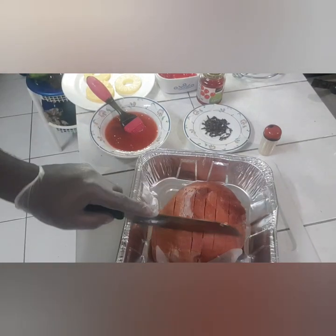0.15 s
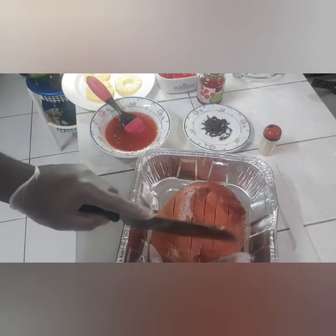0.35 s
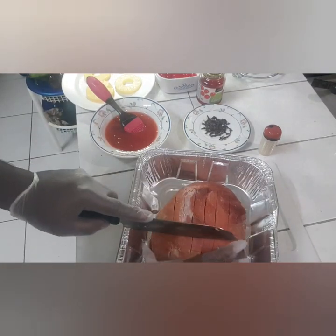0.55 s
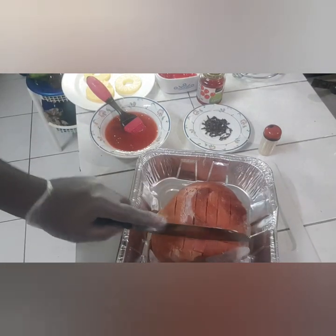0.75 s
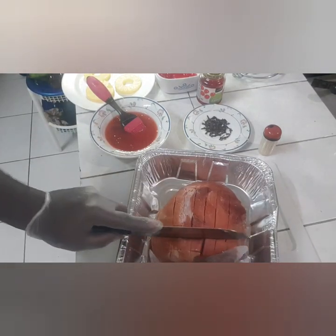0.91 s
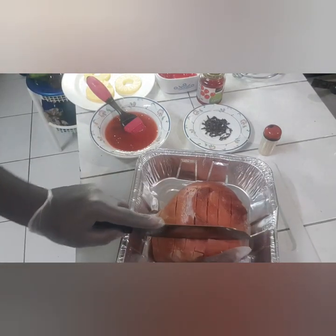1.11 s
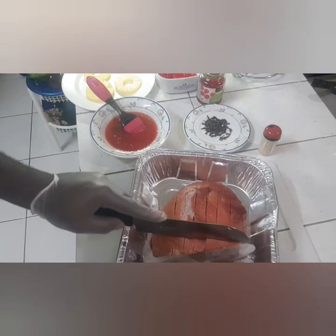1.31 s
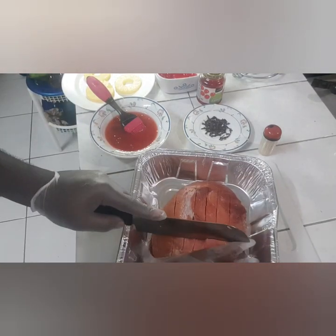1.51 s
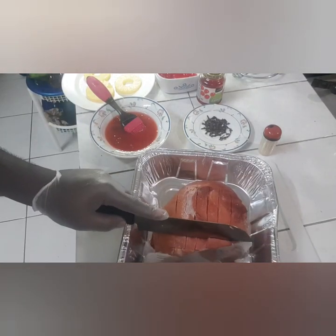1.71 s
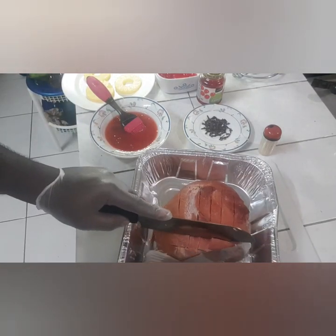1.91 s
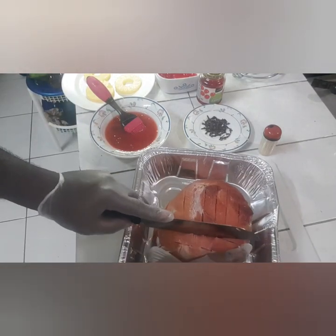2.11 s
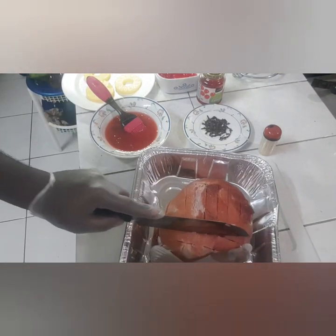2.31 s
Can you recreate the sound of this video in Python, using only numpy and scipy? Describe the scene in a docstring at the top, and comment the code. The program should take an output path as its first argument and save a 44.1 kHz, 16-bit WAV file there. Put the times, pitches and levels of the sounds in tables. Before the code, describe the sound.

Sharp, hollow pops of a thin foil pan come irregularly, close by, while a knife cuts a ham in it. Between them the pan bumps softly and the blade faintly ticks and hisses. An appliance hums in the slightly echoing kitchen.

```python
"""Hollow knocks and pops of a foil tray on a counter, as a kitchen knife scores the ham inside it.
Each push makes the thin foil crack, pop and ring; the tray rocks, bumps softly and scuffs.
The blade ticks through the rind and hisses in the meat.
A small tiled kitchen rings around it all, and an appliance hums faintly behind."""
import sys
import numpy as np
from scipy import signal
from scipy.fft import rfft, irfft, next_fast_len
from scipy.io import wavfile
from scipy.ndimage import uniform_filter1d, map_coordinates

SR = 44100
rng = np.random.default_rng(int(sys.argv[2]) if len(sys.argv) > 2 else 0)


def store_wav(level_fs):
    """Save 16-bit WAV to argv[1]."""
    pcm = np.round(np.clip(np.atleast_2d(level_fs), -1, 1) * 32767)
    wavfile.write(sys.argv[1], SR, pcm.T.astype(np.int16))


N = 103635
SHARP_ATTACK_S = 0.00017  # shared by the foil's crack and the rind's snap


def tray_knocks():
    """The foil cracks, pops and rings; each spot of contact favours two bands. One track per knock."""
    # pushes on the tray (time [s], level [dB], low band [Hz], its gain [dB], high band [Hz],
    # its gain [dB], bass shelf [dB], treble shelf [dB], ring level [dB], pop t60 [s],
    # left over right [dB], left lag [ms])
    knocks = [(0.2218, -17.5, 1070, 2, 2200, 4, -5, -0.5, -13.5, 0.065, 0, 0.031),
              (0.4300, -13.5, 1150, 1.5, 2090, 6.5, -10, 15.5, -11, 0.041, -0.5, 0.039),
              (1.234, -16.5, 863, 8.5, 1580, 8, 8.5, -14, -13, .06, 0.5, -0.071),
              (1.2970, -38.5, 1000, 6, 4100, 14, 11, 6, -9, 0.02, -3, 0),
              (1.4997, -20, 1020, 9.5, 1770, 6, 1.5, 0, -18, 0.049, -1, 0.026),
              (1.5174, -28, 1010, 8, 1300, 7.5, -4, -2, -24, 0.048, 3.5, 0.099),
              (2.0040, -27, 1600, 4, 2500, 6.5, -8, 3.5, -13.5, 0.027, 0, 0.047),
              (2.0120, -28.5, 503, -2, 1700, 12, -2, -0.5, -14, 0.027, 0, 0.091),
              (2.0668, -22.5, 1580, 6, 3450, 1, -2.5, 2.5, -27, 0.048, -0.5, -0.066)]
    # tone of the thin foil's dense ring (frequency [Hz], relative density [dB])
    foil_tone = [(60, -47.5), (250, -19.5), (380, -10.5), (500, -5), (680, -8), (1000, -2.5), (1700, -3),
                 (2600, -4.5), (3300, -9), (4200, -15.5), (6500, -22), (8200, -31.5), (11500, -27),
                 (16000, -39)]
    # modes of the tray (frequency [Hz], relative level [dB], t60 [s])
    modes = [(298.5, -1.5, 0.43), (608, -1.5, 0.24), (766, -1, 0.23), (841, -1.5, 0.14), (944, -5.5, 0.25),
             (993, -4.5, 0.25), (1071, -4.5, 0.19), (1185, 1, 0.11), (1410, -9, 0.27), (1589, -5, 0.15),
             (1790, -4.5, 0.12), (2080, -4, 0.067), (2125, 3, 0.071), (2670, 2.5, 0.067)]
    crack_db, crack_t60_s, crack_hz = -2, 0.015, 4040  # the first hard touch
    bass_hz, treble_hz = 520, 4900
    tracks, t = [], np.arange(SR // 2) / SR
    ears = np.array([[.5], [-.5]])
    for (s, db, low_hz, low_db, high_hz, high_db,
         bass_db, treble_db, ring_db, pop_t60, pan_db, lag_ms) in knocks:
        ring = sum(amp(level + 2 * rng.normal() - 60 * t / t60)
                   * np.sin(2 * np.pi * (hz * t + rng.random())) for hz, level, t60 in modes)
        crack = burst(t, crack_t60_s, SHARP_ATTACK_S)
        crack = filtered(crack, lambda hz: causal(crack_db - 14 * below(hz, crack_hz)))
        pop = burst(t, pop_t60, attack_s=0.0019)
        pop = filtered(pop, lambda hz: causal(-4 * (1 - below(hz, crack_hz))))
        knock = crack + pop + amp(ring_db) * ring / np.linalg.norm(ring)
        bands = lambda hz: low_db * bell(hz, low_hz) + high_db * bell(hz, high_hz)
        shelves = lambda hz: bass_db * below(hz, bass_hz) + treble_db * (1 - below(hz, treble_hz))
        colour = lambda hz: causal(along(foil_tone, hz) + bands(hz) + shelves(hz))
        pan = lambda hz: amp(ears * pan_db) * np.exp(-2j * np.pi * hz * ears * lag_ms / 1000)
        tracks.append(placed(s, db, filtered(knock, lambda hz: colour(hz) * pan(hz))))
    return tracks


def knife_cuts():
    """Bright snaps of the rind over the grainy hiss of the sliding blade."""
    # the blade breaks the rind (time [s], level [dB], t60 [s], body shelf [dB])
    snaps = [(0.079, -46, 0.073, -9), (0.103, -45, 0.044, -15), (1.1570, -34, 0.066, 3.5),
             (1.6850, -38, 0.0095, -9)]
    # tone of a snap (frequency [Hz], relative density [dB])
    snap_tone = [(300, -38), (1200, 4.5), (2500, 5), (5000, -7), (7000, -1), (8500, -8.5), (13000, 6),
                 (16000, -4.5)]
    # the blade slides in the meat (peak time [s], level [dB], rise [s], fall [s])
    slices = [(0.79, -59, 0.062, 0.047), (0.97, -60.5, 0.074, 0.099), (1.13, -55.5, 0.013, .01),
              (1.215, -46, .05, 0.057), (1.29, -55.5, 0.011, 0.016), (1.40, -58, 0.017, 0.033),
              (1.69, -56.5, 0.16, 0.05), (2.11, -59, 0.06, .06), (2.32, -61, 0.14, .08)]
    # tone of the blade's hiss (frequency [Hz], relative density [dB])
    hiss_tone = [(500, 1), (3000, -6), (6800, 8), (8200, -0.5), (11000, 10.5), (13500, 10), (16000, 5)]
    split_hz = 12400  # body below, sparkle above
    ticks, t = np.zeros((2, N)), np.arange(SR // 2) / SR
    for s, db, t60, body_db in snaps:
        colour = lambda hz: causal(along(snap_tone, hz) + body_db * below(hz, split_hz))
        ticks += placed(s, db, filtered(burst(t, t60, SHARP_ATTACK_S), colour))
    hiss = unit(noise(hiss_tone) * amp(3.2 * wobble(rate=600)))
    return ticks + sum(swell(*stroke) for stroke in slices) * hiss


def tray_rocking():
    """The tray rocks, bumps softly and scuffs on the counter, which thuds under the deepest push."""
    # soft bumps and scuffs of the tray (peak time [s], level [dB], rise [s], fall [s])
    bumps_and_scuffs = [(0.562, -35.5, 0.0066, 0.017), (1.005, -49.5, 0.012, 0.029),
                        (1.151, -40.5, 0.02, 0.022), (1.228, -34, .015, 0.052), (1.325, -38.5, 0.1, 0.025),
                        (1.37, -40.5, 0.0059, 0.039), (2.31, -52, 0.041, .05)]
    # tone of the tray against the counter (frequency [Hz], relative density [dB])
    contact_tone = [(40, -29), (150, -36), (310, -7), (450, -12), (620, -2.5), (900, 0), (1150, -1),
                    (1400, -6), (2200, -14), (4000, -25.5), (16000, -53)]
    # tone of the counter's thud (frequency [Hz], relative density [dB])
    thud_tone = [(25, -55), (50, -14), (68, 8), (110, -3), (200, -10.5), (500, -50)]
    contact = unit(noise(contact_tone) * amp(2.5 * wobble(rate=110)))
    thud = swell(s=1.22, db=-47.5, rise_s=0.067, fall_s=0.19) * noise(thud_tone)
    return sum(swell(*move) for move in bumps_and_scuffs) * contact + thud


def kitchen_reverb(x):
    """The tiled room's tail; the treble dies first."""
    # decay of the room (frequency [Hz], t60 [s])
    decay_times = [(150, 0.5), (600, 0.75), (1500, 0.44), (4000, 0.54), (8000, 0.41), (14000, 0.3)]
    build_s = 0.002
    white = noise([(1, 0)], size=SR * 2 // 3)
    hz, t, bands = signal.stft(white, SR, nperseg=256)
    envelope = amp(-60 * t / along(decay_times, hz)[:, None]) * (1 - np.exp(-t / build_s))
    tail = signal.istft(bands * envelope, SR, nperseg=256)[1]
    return signal.fftconvolve(x, tail / np.linalg.norm(tail[0]), axes=1)[:, :N]


def appliance_and_air():
    """Beating motor and mains tones over a bed of room air."""
    # the appliance's hum (frequency [Hz], level [dB])
    hum_tones = [(100, -58.5), (112.8, -54.5), (199.6, -59.5), (318, -70.5), (481, -61), (631, -66)]
    # room tone (frequency [Hz], relative density [dB])
    air_tone = [(15, -44), (25, -23), (53, -7.5), (80, -6), (120, -2.5), (157, -6), (223, -8.5), (301, -14),
                (489, -8), (695, -11.5), (988, -11.5), (1230, -14.5), (1700, -12), (3520, -25.5),
                (8590, -35), (12900, -32), (16000, -33)]
    air_db = -49
    t = np.arange(N) / SR
    hum = np.zeros(N)
    for hz, db in hum_tones:
        phase = 2 * np.pi * (hz * t + rng.random()) + .22 * wobble(rate=5)
        hum += amp(db) * np.sqrt(2) * np.sin(phase)
    return hum + amp(air_db) * noise(air_tone)


def burst(t, t60, attack_s, width=0.59):
    """A stereo burst of dense, fast-dying vibration with an even spectrum."""
    x = rng.standard_normal((2, len(t))) * amp(-60 * t / t60) * (1 - np.exp(-t / attack_s))
    smooth_db = lambda z: 10 * np.log10(np.abs(uniform_filter1d(np.abs(z) ** 2, size=200)) + 1e-9)
    mid, side = irfft([z * causal(-smooth_db(z)) for z in rfft(x)], len(t))
    return np.array([mid + width * side, mid - width * side])


def noise(tone, size=N):
    """Coloured stereo noise of rms 1, nearly mono in the bass."""
    # stereo image (frequency [Hz], left-right correlation [0..1])
    likeness = [(30, 0.84), (130, 1), (300, 0.85), (1000, 0.2), (3000, 0.1), (10000, 0.033)]
    angle = lambda hz: np.arccos(np.clip(along(likeness, hz), -1, 1)) / 2
    gains = lambda hz: amp(along(tone, hz)) * [np.cos(angle(hz)), np.sin(angle(hz))]
    mid, side = filtered(rng.standard_normal((2, size)), gains)
    return unit(np.array([mid + side, mid - side]))


def swell(s, db, rise_s, fall_s):
    """A smooth rise and fall, peaking at time s."""
    t = np.arange(N) / SR - s
    return amp(db) * np.exp(-(t / np.where(t < 0, rise_s, fall_s)) ** 2)


def wobble(rate):
    """A smooth random curve, rate knots a second."""
    knots = rng.standard_normal(int(N * rate / SR) + 4)
    return map_coordinates(knots, [np.arange(N) * rate / SR])


def placed(s, db, x):
    """A hit set at time s, with the energy of db held for 10 ms."""
    x = x * amp(db) * np.sqrt(2 * SR * .01 / np.sum(x ** 2))
    return np.pad(x, ((0, 0), (round(s * SR), N)))[:, :N]


def filtered(x, response):
    """x through a frequency response."""
    n = x.shape[-1]
    m = next_fast_len(n + SR // 4)
    return irfft(rfft(x, m) * response(np.fft.rfftfreq(m, 1 / SR)), m)[..., :n]


def causal(db):
    """A minimum-phase EQ with these gains, so nothing rings ahead of a hit."""
    cepstrum = irfft(np.log(amp(db)))
    cepstrum[1:len(cepstrum) // 2] *= 2
    cepstrum[len(cepstrum) // 2 + 1:] = 0
    return np.exp(rfft(cepstrum))


def bell(hz, centre_hz, half_width_octaves=0.18):
    """An EQ bell: 1 at its centre."""
    return 1 / (1 + (np.log2((hz + 1) / centre_hz) / half_width_octaves) ** 2)


def below(hz, edge_hz):
    """A soft shelf: 1 under the edge, 0 over it."""
    return 1 / (1 + (hz / edge_hz) ** 4)


def along(points, hz):
    """A curve through (Hz, value) points on a log axis."""
    freqs, values = np.transpose(points)
    return np.interp(np.log(hz + 1), np.log(freqs + 1), values)


def amp(db):
    """Decibels to gain."""
    return 10 ** (np.asarray(db) / 20)


def unit(x):
    """Scale to rms 1."""
    return x / np.sqrt(np.mean(x ** 2) + 1e-20)


def scene():
    """Tray and knife in the room; each spot of contact has its own echoes."""
    reverb_db = -7.5
    tracks = tray_knocks() + [knife_cuts(), tray_rocking()]
    return sum(x + amp(reverb_db) * kitchen_reverb(x) for x in tracks) + appliance_and_air()


def record(dry):
    """A brick-wall high cut at 16 kHz."""
    return filtered(dry, lambda hz: hz < 16000)


dry = scene()
out = record(dry)
store_wav(out)
```